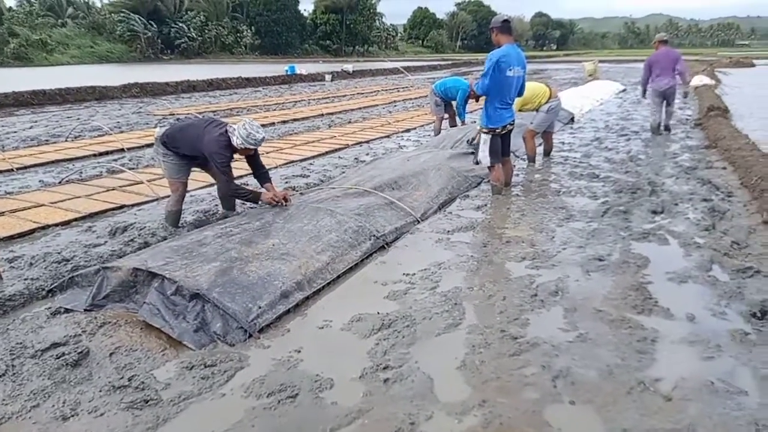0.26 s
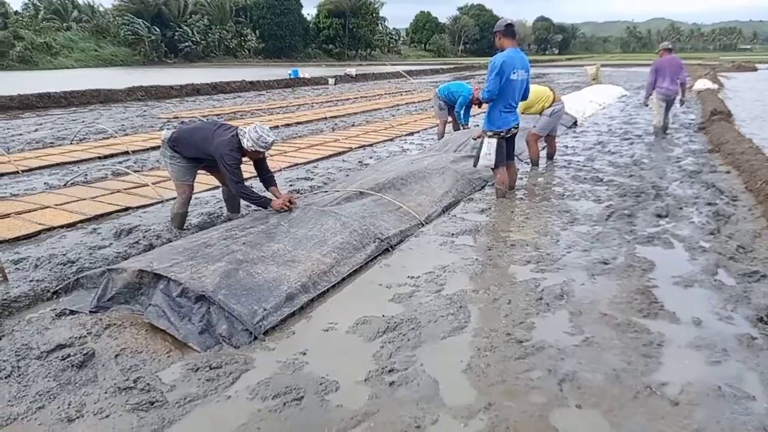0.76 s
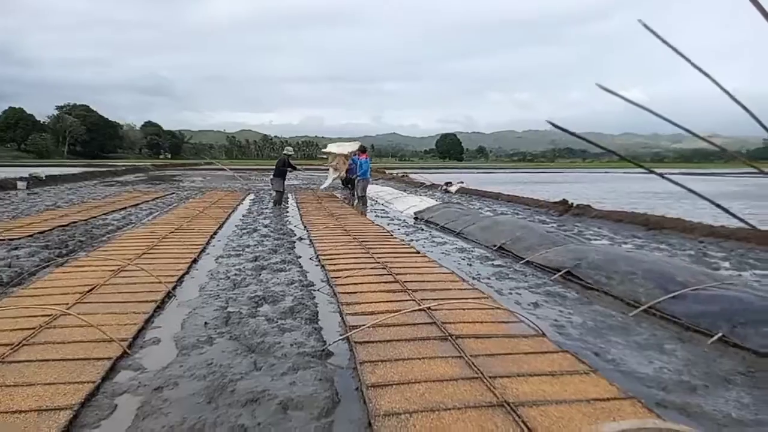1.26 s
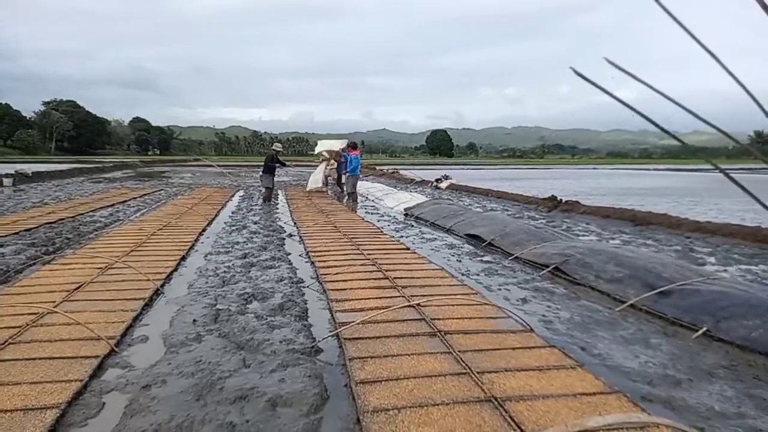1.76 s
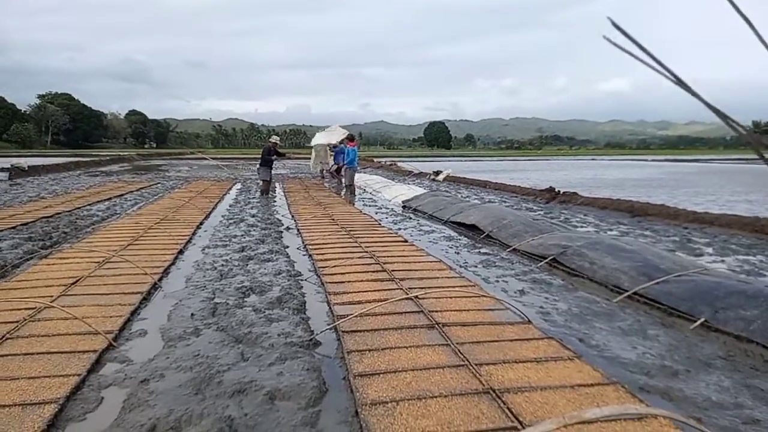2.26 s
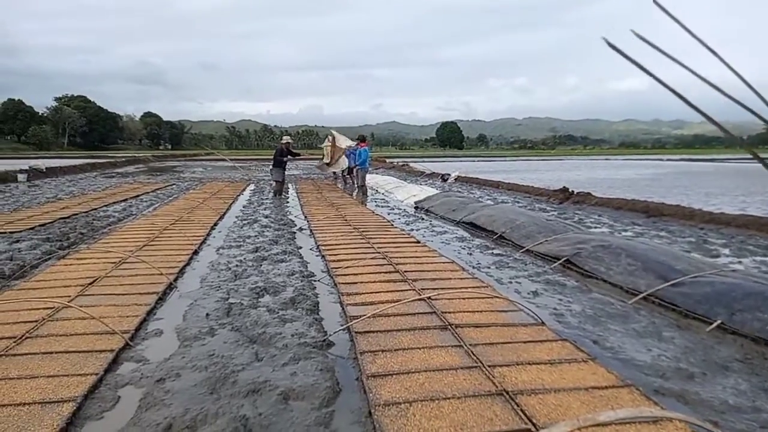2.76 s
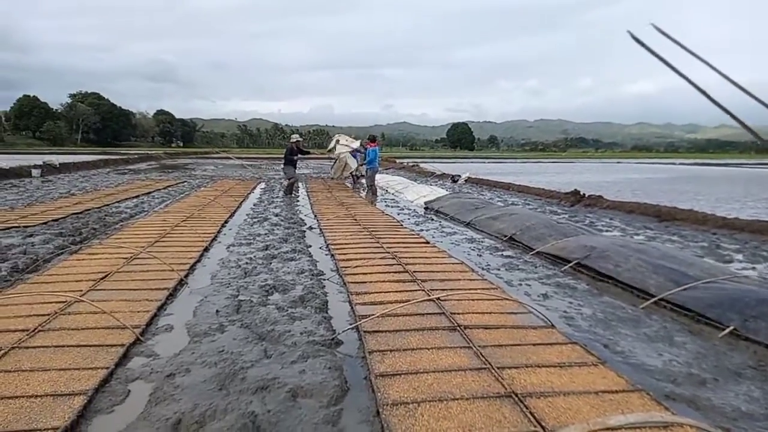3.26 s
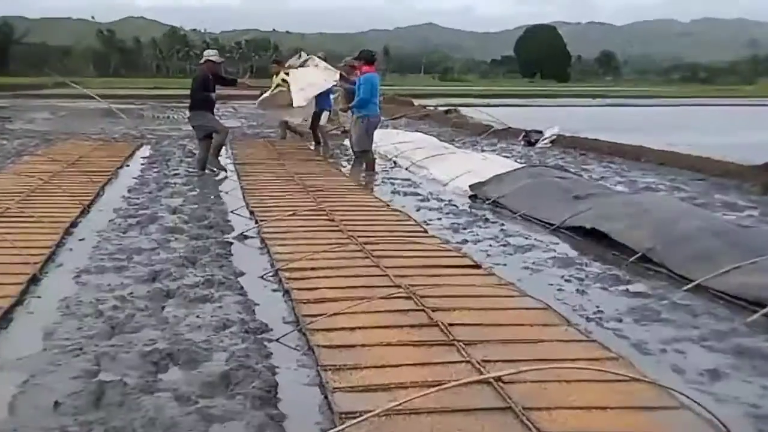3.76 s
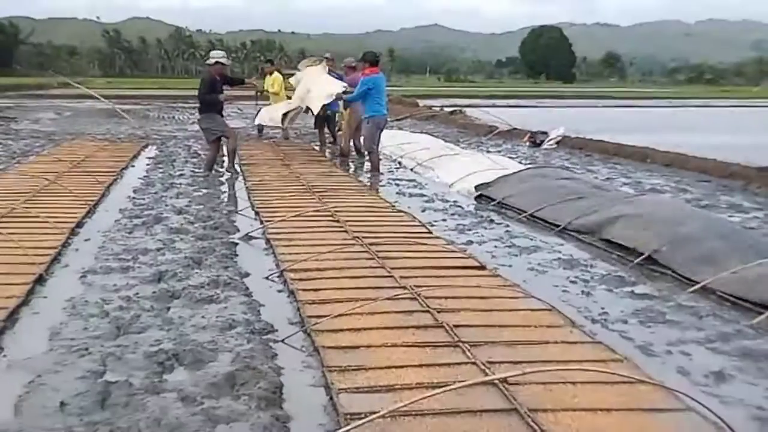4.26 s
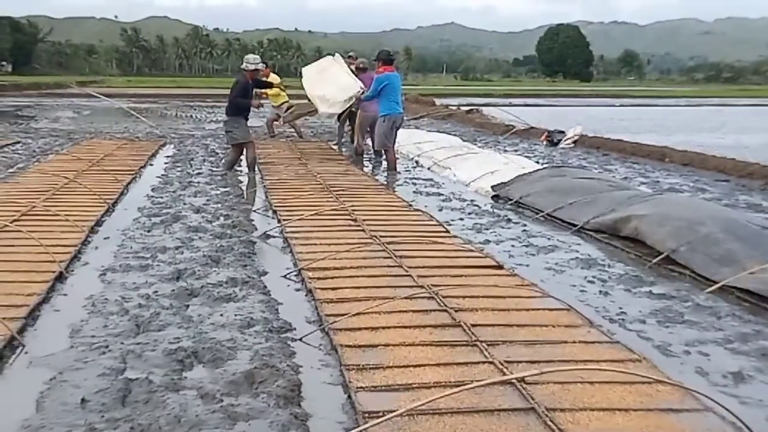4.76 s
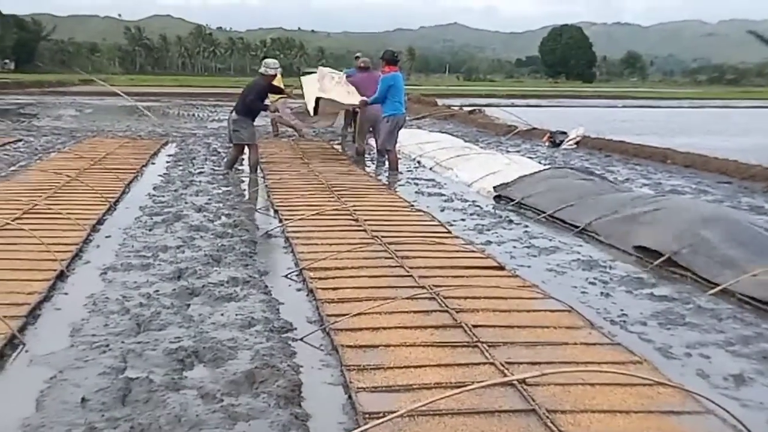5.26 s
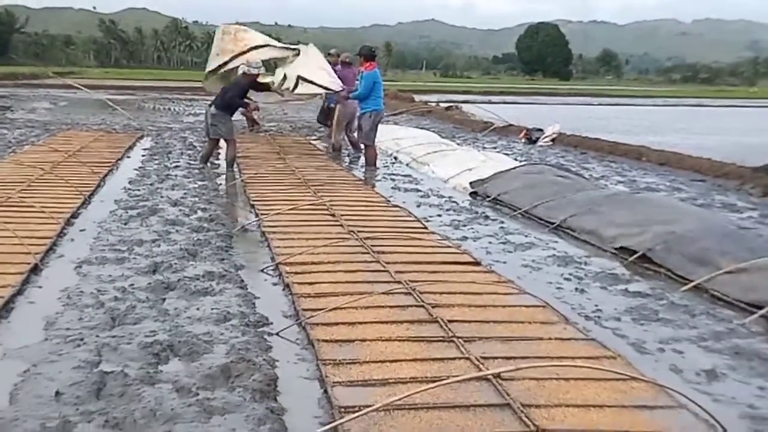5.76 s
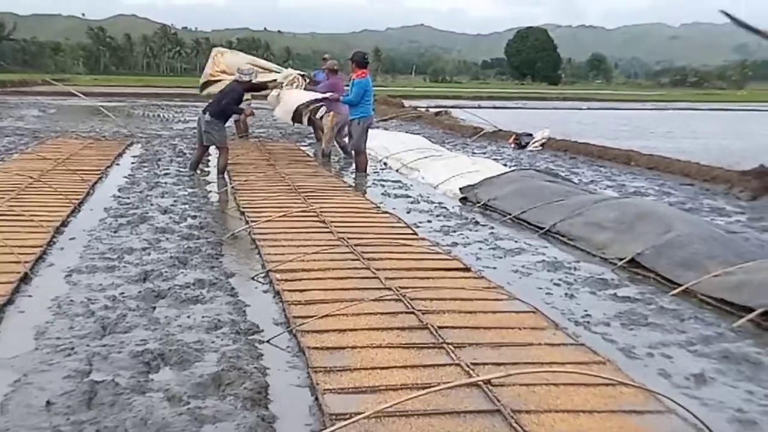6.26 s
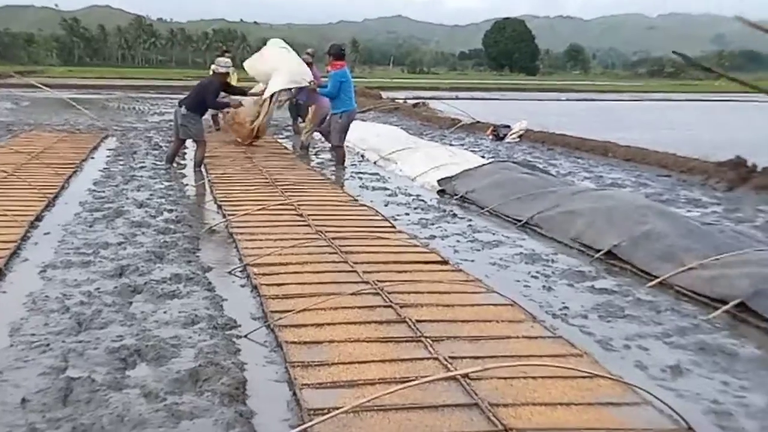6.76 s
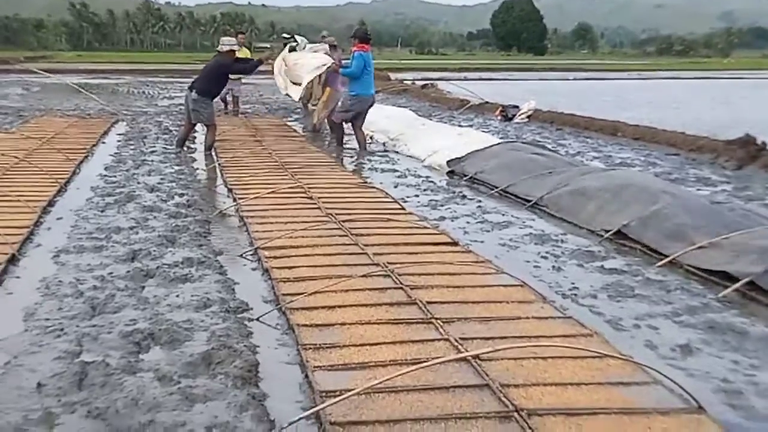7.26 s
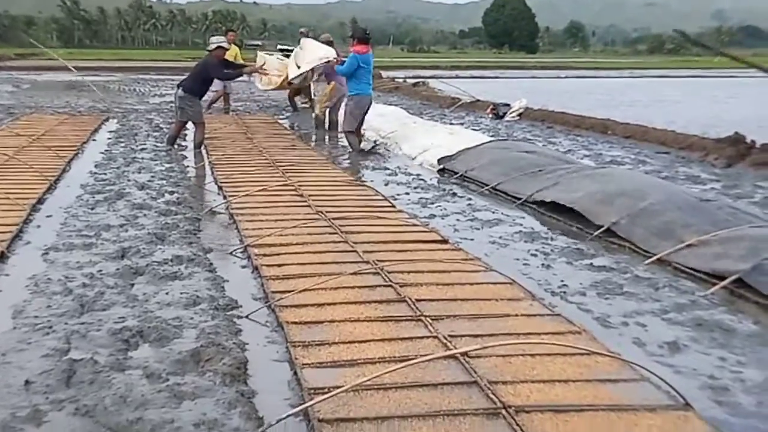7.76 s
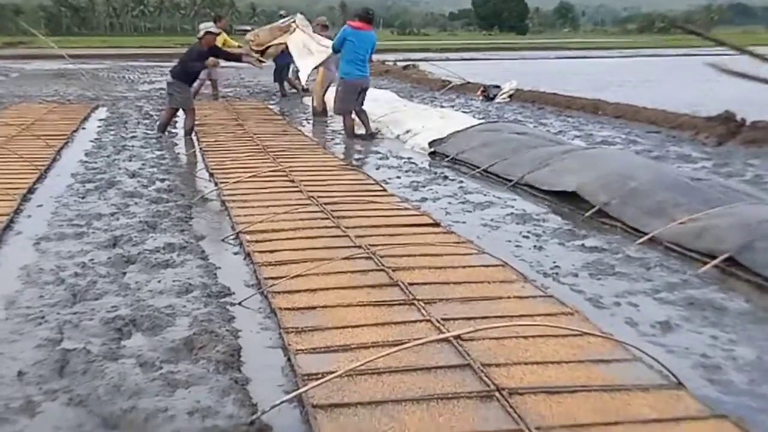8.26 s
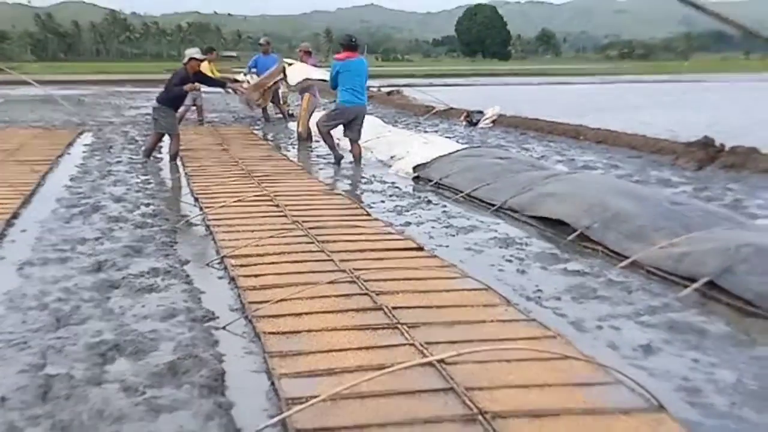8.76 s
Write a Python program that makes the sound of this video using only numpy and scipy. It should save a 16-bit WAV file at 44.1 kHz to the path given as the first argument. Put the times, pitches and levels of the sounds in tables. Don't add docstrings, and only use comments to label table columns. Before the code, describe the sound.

Rough gusts batter a small microphone over muddy fields, sheeting snaps faintly, sound drops out briefly, then the buffeting returns and stops abruptly.

```python
import sys
import numpy as np
from scipy import signal
from scipy.fft import rfft, irfft, next_fast_len
from scipy.io import wavfile
from scipy.ndimage import uniform_filter1d

SR = 44100
rng = np.random.default_rng(int(sys.argv[2]) if len(sys.argv) > 2 else 0)


def attenuation_scalar(level_db):
    decades = np.asarray(level_db, float) / 20
    return 10 ** decades


def log_audio(samples):
    frames = np.atleast_2d(samples).T
    limited = np.clip(frames, -1, 1)
    pcm = np.round(limited * 32767).astype(np.int16)
    wavfile.write(sys.argv[1], SR, pcm)


N = 397782


def evened(x):
    return x / np.sqrt(np.mean(x ** 2) + 1e-20)


def read(points, hz):
    f, value = np.transpose(points)
    return np.interp(np.log(hz + 1), np.log(f + 1), value)


def coloured(x, points):
    size = 8192
    hz = abs(np.fft.fftfreq(size, 1 / SR))
    log_gain = np.log(attenuation_scalar(np.maximum(read(points, hz), -100)))
    taps = np.fft.ifft(np.exp(np.conj(signal.hilbert(log_gain)))).real[:size // 2]
    return signal.oaconvolve(x, taps)[:N]


def band_db(x, lo, hi):
    z, hz = rfft(x), np.fft.rfftfreq(len(x), 1 / SR)
    inside = (hz > lo) & (hz < hi)
    return 10 * np.log10(2 * np.sum(abs(z[inside]) ** 2)) - 20 * np.log10(len(x))


def wander(t, lo_hz, hi_hz, slope):
    hz = np.fft.rfftfreq(len(t), t[1])
    shape = (hz + 1) ** -slope / (1 + (lo_hz / (hz + .01)) ** 2) / (1 + (hz / hi_hz) ** 2)
    return evened(irfft(rfft(rng.standard_normal(len(t))) * shape, len(t)))


def sheltered(t):
    return t < SPLICES[1][0]


# (middle time [s], level change [dB], length [ms])
LULLS = [(0.2, -3, 80), (0.66, -3, 60), (0.84, -1.5, 110), (1.04, 2, 39), (1.65, -5, 45),
         (2.045, -15.5, 43), (4.65, -6, 40), (5.33, -7, 35), (5.8, -7.5, 120), (6.88, -1.5, 160),
         (7.62, -8, 200), (7.725, -16, 17), (7.855, -17, 25), (17, -13.5, 25), (9.6, -2, 27),
         (8.91, -6, 20), (8.0, -5.5, 160), (8.55, -5, 46), (3.7, 0.5, 36), (.345, -8.5, 15)]


def stall_db(t):
    return sum(depth_db * np.exp(-((t - at) * 2000 / ms) ** 2) for at, depth_db, ms in LULLS)


# (time [s], pressure level [dB], bright edge against the pressure [dB])
WIND = [(0.0, -16.5, -6.5), (1.126, -19.5, -9), (1.129, -27, -13.5), (1.7, -21, -18), (2.05, -24, -30.5),
        (2.401, -18, -26), (3.0, -16, -24.5), (3.25, -14, -19), (3.45, -24, -32.5), (3.8, -17.5, -22.5),
        (4.151, -21, -34), (4.55, -13, -21), (5.68, -17, -12.5), (5.85, -14.5, -17.5), (6.3, -23.5, -11),
        (7.349, -20.5, -9.5), (7.75, -26.5, -17), (8.3, -15.5, -15)]


def air(t):
    s, pressure_db, sharp_db = np.transpose(WIND)
    lull_dulls = 2.1
    stall = stall_db(t)
    edge_db = np.interp(t, s, pressure_db + sharp_db) + lull_dulls * stall
    return np.interp(t, s, pressure_db) + stall, edge_db


# (middle time [s], bright level [dB])
SLAPS = [(0.278, -27), (0.328, -17), (0.411, -19), (.493, -21), (0.596, -25), (1.495, -21.5),
         (1.714, -24), (1.765, -17.5), (1.877, -24), (1.972, -35), (2.081, -20), (2.169, -24),
         (2.21, -39), (2.241, -26.5), (2.27, -13.5), (2.358, -29.5), (2.413, -31), (2.462, -33.5),
         (2.574, -21), (3.017, -24.5), (4.267, -17), (3.315, -29), (3.584, -34), (3.631, -21.5),
         (3.645, -17.5), (3.859, -24), (4.19, -29.5), (4.338, -22), (4.581, -14.5), (4.731, -12.5),
         (5.363, -14.5), (5.383, -17), (5.55, -16.5), (7.64, -42.5), (5.618, -24), (5.85, -25.5),
               (5.931, -26), (5.991, -15.5), (6.038, -21.5), (6.587, -22), (6.603, -27.5), (6.747, -27),
               (6.95, -25), (7.024, -25.5), (7.174, -14), (7.207, -21), (7.29, -22), (7.333, -20.5),
               (7.374, -14.5), (7.491, -22), (7.553, -31), (7.788, -37.5), (7.964, -35.5), (8.062, -36.5),
               (8.187, -20.5), (8.341, -23.5), (8.577, -28.5), (8.683, -26), (8.859, -22), (8.964, -23)]
# (middle time [s], bright level [dB], length [ms])
ROLLS = [(.055, -30.5, 43), (.125, -29.5, 50), (.361, -15.5, 34), (.417, -23, 58),
         (.559, -19.5, 110), (.702, -17, 27), (.747, -15.5, 27), (.924, -23.5, 26),
         (1.004, -16.5, 33), (1.076, -22, 22), (1.197, -38, 25), (1.301, -33, 48), (1.54, -36, 30),
         (1.81, -35.5, 54), (2.299, -15.5, 23), (2.513, -21, 23), (2.763, -34, 33), (2.9, -21, 25),
         (3.046, -19, 20), (3.116, -17.5, 32), (3.222, -16.5, 46), (3.794, -24.5, 35),
         (4.032, -27, 21), (4.076, -19.5, 24), (4.291, -17, 27), (4.395, -14.5, 20), (4.5, -26, 110),
         (4.605, -20, 18), (4.662, -22.5, 25), (2.328, -17, 26),
         (5.193, -45, 32), (5.25, -14.5, 25), (5.286, -21, 25), (5.424, -26.5, 22), (5.462, -15, 18),
               (5.518, -15, 44), (5.676, -28.5, 46), (5.898, -15.5, 34), (5.956, -11, 16),
               (6.068, -14.5, 21), (6.171, -32, 19), (6.31, -23.5, 26), (6.367, -18.5, 50),
               (6.522, -19.5, 21), (6.626, -28.5, 39), (6.69, -17, 32), (6.968, -27.5, 19),
               (7.053, -20, 66), (7.103, -15, 24), (7.137, -14, 30), (7.4, -14.5, 50), (7.699, -32, 42),
               (7.893, -31.5, 25), (8.143, -28, 20), (8.24, -24, 48), (8.395, -17, 27), (8.437, -24, 32),
               (8.504, -21.5, 21), (8.774, -23, 36), (8.814, -24, 26)]


def strong_eddies():
    slap_ms = 12.2
    slaps = [(*row, slap_ms) for row in SLAPS]
    s, bright_db, ms = np.transpose(slaps + ROLLS)
    thud_db, thud_follows = -1, 0.42
    return np.transpose([s, bright_db, thud_db + (thud_follows - 1) * bright_db, ms])


def eddies(t, narrow=0.55, blur_ms=4.5):
    low, bright = np.zeros((2, len(t)))
    for s, bright_db, low_db, ms in strong_eddies():
        at = max(round(s / t[1]) - 200, 0)
        near = slice(at, at + 400)
        span = t[near] - s
        span = span * np.where(span < 0, 1.15, .9)
        bright_ms = narrow * max(ms - blur_ms, 2)
        bright[near] += attenuation_scalar(2 * (bright_db - 0.14)) * np.exp(-abs(span * 1000 / bright_ms) ** 2.8)
        low[near] += attenuation_scalar(2 * (bright_db + low_db - 7.0)) * np.exp(-abs(span * 1000 / (0.54 * ms)) ** 2)
    return low, bright


# (frequency [Hz], level [dB per Hz])
BUFFET = [(15, -58), (25, -50), (72, -4.5), (117, 0), (410, -1.5), (712, -6.5), (2610, -33), (3720, -45.5),
          (4840, -58), (6290, -83.5), (10600, -120)]
# (frequency [Hz], share [1])
FOLLOW = [(60, -0.3), (150, -0.16), (300, 0.019), (600, 0.6), (1200, 0.92), (2500, 1.764), (5000, 2)]


def buffeting(per_s=2500, spread_db=2.0, smooth=0.56):
    kicks = (rng.random(N) < per_s / SR) * attenuation_scalar(spread_db * np.minimum(rng.exponential(1, N), 4))
    drive = evened(kicks * rng.standard_normal(N)) + smooth * rng.standard_normal(N)
    s, _, _, ms = strong_eddies().T
    core = np.round(s * SR).astype(int)
    firm = np.where(sheltered(s), 40, 160)
    drive[core] += firm / ms * rng.choice([-1, 1], len(s))
    drive = coloured(drive, BUFFET)

    step = 16
    t = np.arange(next_fast_len(N // step + 2)) * step / SR
    pressure_db, edge_db = air(t)
    flutter = wander(t, lo_hz=3.7, hi_hz=90, slope=0.13)
    lumps = wander(t, lo_hz=20, hi_hz=60, slope=0.26)
    flutter_db = np.where(sheltered(t), 1.6, 2.8)
    low, bright = eddies(t)
    low = low + attenuation_scalar(2 * (pressure_db - 3 + 0.52 * flutter + 2.56 * lumps))
    bright = bright + attenuation_scalar(2 * (edge_db + flutter_db * flutter))
    low_db = 10 * np.log10(low) - band_db(drive, 60, 350)
    bright_db = 10 * np.log10(bright) - band_db(drive, 700, 3000)

    size = next_fast_len(N)
    z = rfft(drive, size)
    lowest_hz, count = 60, 13
    place = 2 * np.log2(np.fft.rfftfreq(size, 1 / SR) / lowest_hz + 1e-9)
    out = np.zeros(N)
    for k in range(count):
        weight = np.maximum(1 - abs(np.clip(place, 0, count - 1) - k), 0)
        band = irfft(z * weight, size)[:N]
        share = read(FOLLOW, lowest_hz * 2 ** (k / 2))
        patch_db = 1.5 * wander(t, lo_hz=1.7, hi_hz=50, slope=0.5)
        gain = attenuation_scalar(low_db + share * (bright_db - low_db) + patch_db)
        out += band * np.interp(np.arange(N) / step, np.arange(len(t)), gain)
    return out


# (time [s], level [dB])
HISS = [(0.0, -37.5), (0.33, -46), (1.12, -45.5), (1.126, -63), (1.8, -61.5), (2.4, -56.5), (4.6, -54.5),
        (6.3, -51), (6.88, -58.5), (7.3, -51.5), (7.53, -67.5), (8.66, -63)]
# (frequency [Hz], level [dB per Hz])
FIELD = [(710, -29.5), (1200, -12.5), (1770, -11.5), (3830, -16.5), (4840, -27), (6290, -70), (10600, -120)]


def field_hiss():
    hz, t, z = signal.stft(coloured(rng.standard_normal(N), FIELD), SR, nperseg=512)
    patches = uniform_filter1d(rng.standard_normal(z.T.shape), 7, 0)
    patches = evened(uniform_filter1d(patches, 8, 1)).T
    s, level_db = np.transpose(HISS)
    patchy_db = 1.6 * wander(t, lo_hz=0.97, hi_hz=30, slope=0.65) + 3 * patches
    heard = (hz > 2800) & (hz < 4500)
    z = z / np.sqrt(np.mean(np.sum(2 * abs(z[heard]) ** 2, 0)))
    gain = attenuation_scalar(np.interp(t, s, level_db) + 0.15 * stall_db(t) + patchy_db)
    return signal.istft(z * gain, SR, nperseg=512)[1][:N]


# (middle time [s], pitch [Hz], level [dB], length [ms])
MOANS = [(0.269, 218.3, -21, 49), (0.361, 380, -15, 68), (0.703, 433.5, -20.5, 40), (2.279, 157, -7, 33),
         (2.509, 304, -8, 28), (2.764, 142.8, -28, 19), (2.818, 176, -16, 25), (3, 202.6, -16, 34),
         (3.064, 428.7, -4.5, 40), (3.13, 389.2, -12.5, 45.0), (3.211, 216, -9, 66),
         (3.312, 209.8, -14, 30), (3.502, 148.3, -20.5, 30), (3.55, 148.7, -17, 30),
         (3.25, 399.4, -15.5, 84), (3.665, 452, -15, 45), (8.225, 403.5, -17, 75), (3.83, 143.5, -11.5, 26),
         (3.958, 168.7, -23.5, 89), (4.034, 154.8, -14, 34), (4.744, 210.8, -16.5, 31),
         (5.213, 200.6, -12.5, 45.0), (5.393, 383.2, -9, 77), (5.672, 184.5, -16, 35),
         (5.852, 251, -12.5, 41), (6.368, 279.5, -14.5, 82), (8.282, 264.6, -12.5, 135),
         (8.746, 210.5, -20.5, 50), (8.935, 150.5, -19, 31)]


def moan(wobble=0.13):
    out, t = np.zeros(N), np.arange(-4000, 4000) / SR
    for s, hz, level_db, ms in MOANS:
        drift = evened(uniform_filter1d(rng.standard_normal(len(t)), 400))
        turns = np.cumsum(hz * (1 + wobble * drift)) / SR + rng.random()
        tone = np.sin(2 * np.pi * turns) * np.exp(-(t * 1000 / (0.51 * ms)) ** 2)
        part = out[round((s + t[0]) * SR):][:len(t)]
        part += attenuation_scalar(level_db + 2) * tone[:len(part)]
    return out


# (time [s], peak level [dB], length [ms])
SNAPS = [
    (1.7605, -35.5, 3),
    (1.869, -40.5, 3),
    (2.7744, -39.5, 2.8),
    (3.309, -30, 5.6),
    (3.4288, -37, 3.6),
    (5.1978, -29.5, 4.8),
    (5.361, -30.5, 3),
    (7.7736, -53, 7),
]


def snaps():
    t, out = np.arange(1500) / SR, np.zeros(N + 1500)
    band = signal.butter(2, [2600, 4800], "bandpass", fs=SR, output="sos")
    for s, peak_db, ms in SNAPS:
        spray = signal.sosfilt(band, rng.standard_normal(len(t)) ** 3)
        shape = np.minimum(t / 0.00089, 1) * np.exp(-t * 1000 / ms)
        out[round(s * SR):][:len(t)] += attenuation_scalar(peak_db + 2.5) * evened(spray) * shape
    return out[:N]


def far_rustle(from_s=7.52, level_db=-66, lo_hz=3500, hi_hz=4500):
    band = signal.butter(2, [lo_hz, hi_hz], "bandpass", fs=SR, output="sos")
    t = np.arange(N) / SR
    shimmer_db = 2.1 * evened(uniform_filter1d(rng.standard_normal(N), 2500))
    rustle = evened(signal.sosfilt(band, rng.standard_normal(N)))
    return rustle * attenuation_scalar(level_db + shimmer_db) * np.clip((t - from_s) / .1, 0, 1)


def scene():
    return (buffeting() + moan() + field_hiss() + snaps() + far_rustle())[None]


# (frequency [Hz], level [dB])
CUT = [(20, -11.5), (45, -2.5), (70, 0.18), (4000, -1.14), (5000, -11), (5600, -15.5), (7500, -14),
       (8500, -30.5), (16000, -35.5)]


def wind_filter(x):
    return coloured(.95 * np.tanh(x / .95), CUT)


# (frequency [Hz], level [dB])
GRIT = [(4000, -8.5), (5500, 1.4), (7400, -2.5), (8000, -12), (15000, -10.5)]


def high_noise(x, t, level_db=-77.5):
    edge = np.diff(x, 2, prepend=[0, 0])
    running = np.sqrt(abs(uniform_filter1d(edge ** 2, 300)))
    slow = evened(np.sqrt(abs(uniform_filter1d(x ** 2, 12000))))
    steady = np.where(sheltered(t), .45, .75) * slow ** .6
    swelling = np.where(sheltered(t), .2, .55) * evened(running) ** 1.1
    return attenuation_scalar(level_db) * evened(coloured(rng.standard_normal(N), GRIT)) * (steady + swelling)


# (time [s], pressure [full scale], side [1 = just after, -1 = just before])
SPLICES = [
    (0, .08, 1),
    (1.12732, -.2, -1),
    (4.79665, -.09, -1),
    (5.17572, -.085, 1),
    (5.44905, -.06, 1),
    (9.02, -.045, -1),
]


def splice(x, t):
    for s, pressure, side in SPLICES:
        near = np.exp(-abs(t - s) / .0005)
        x = x * (1 - near) + pressure * near * (side * (t - s) >= 0)
    return x


# (start [s], end [s])
MUTE = (4.79665, 5.17572)


def mute(x, t):
    return x * ((t < MUTE[0]) | (t >= MUTE[1]))


def low_pass(x):
    return signal.sosfilt(signal.butter(12, 15480, fs=SR, output="sos"), x)


def record(dry):
    t = np.arange(N) / SR
    x = wind_filter(dry[0])
    x = x + high_noise(x, t)
    x = mute(splice(x, t), t)
    return low_pass(x[None])


dry = scene()
out = record(dry)
log_audio(out)
```